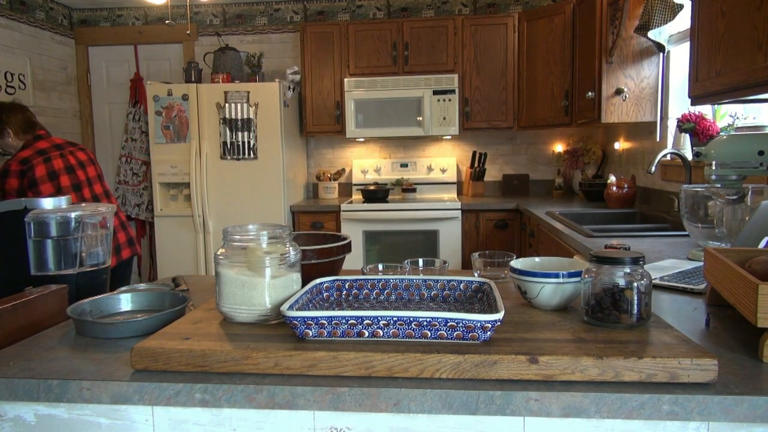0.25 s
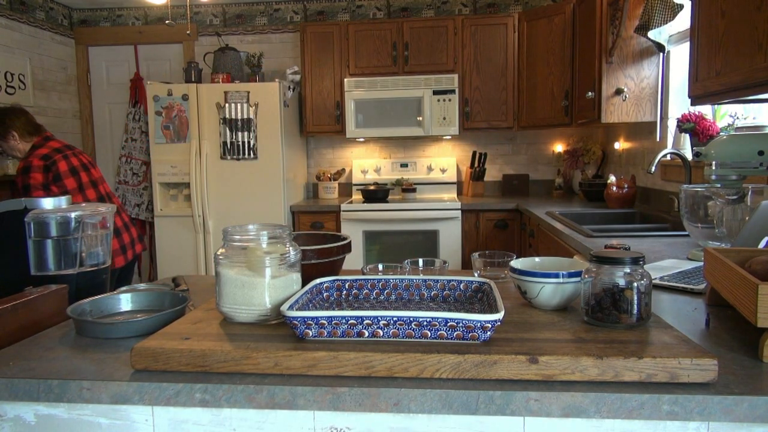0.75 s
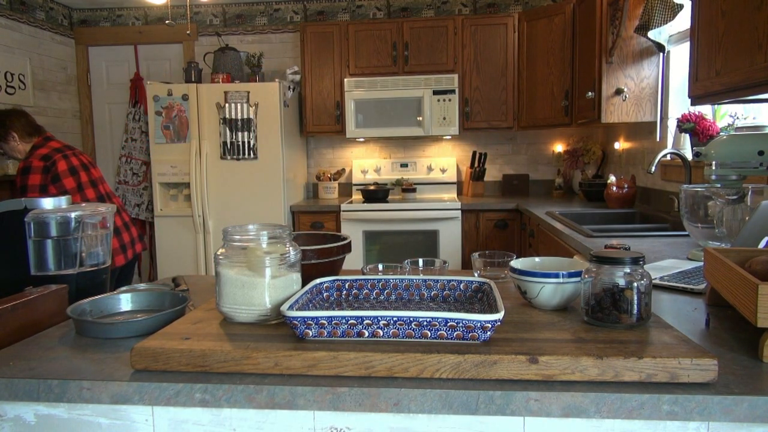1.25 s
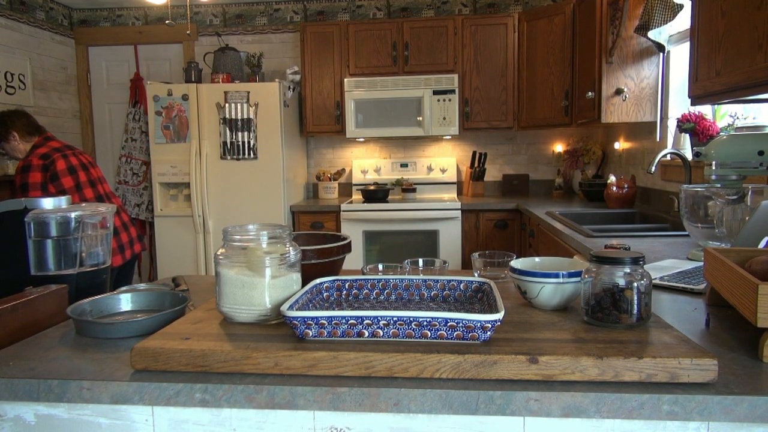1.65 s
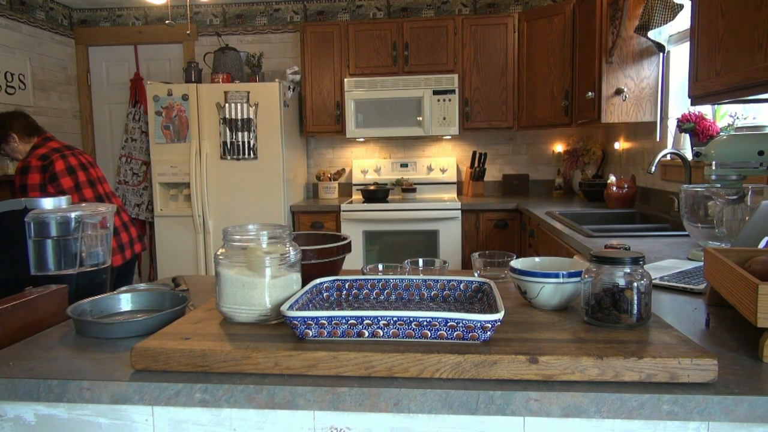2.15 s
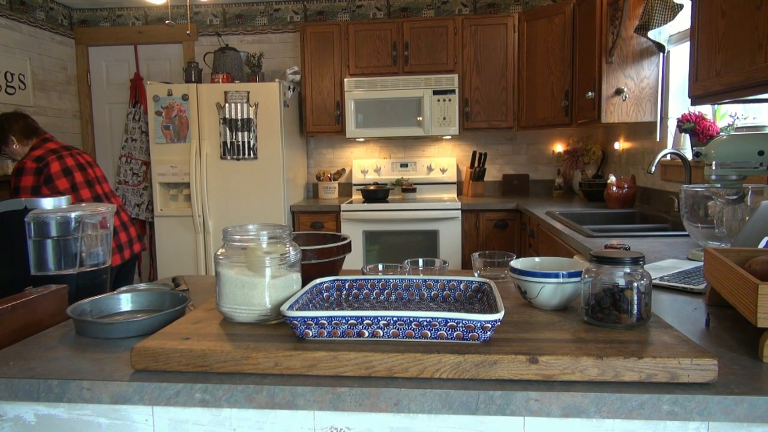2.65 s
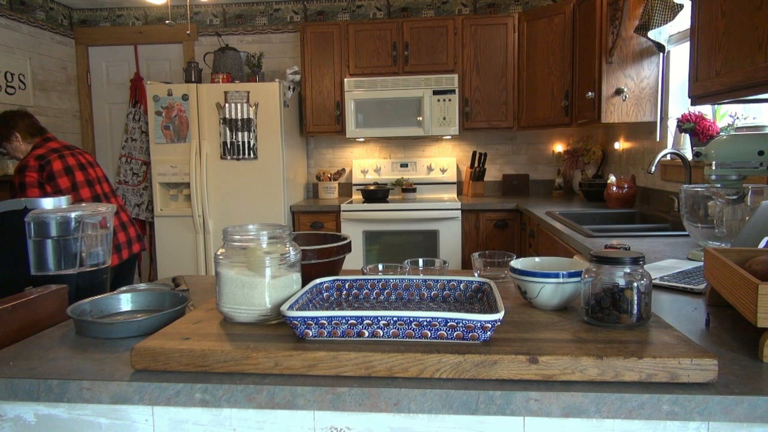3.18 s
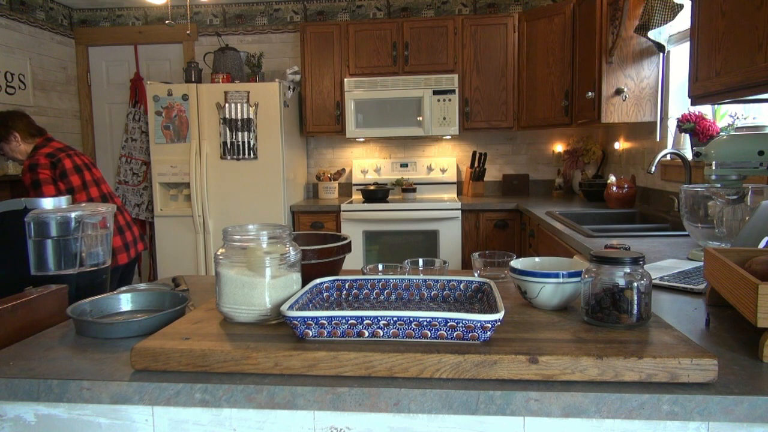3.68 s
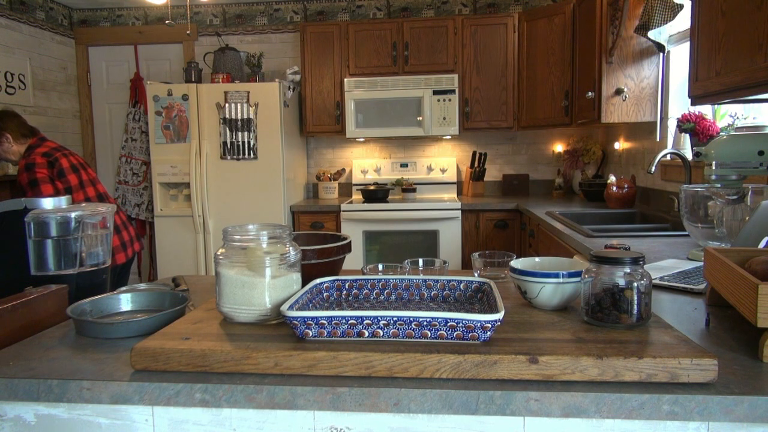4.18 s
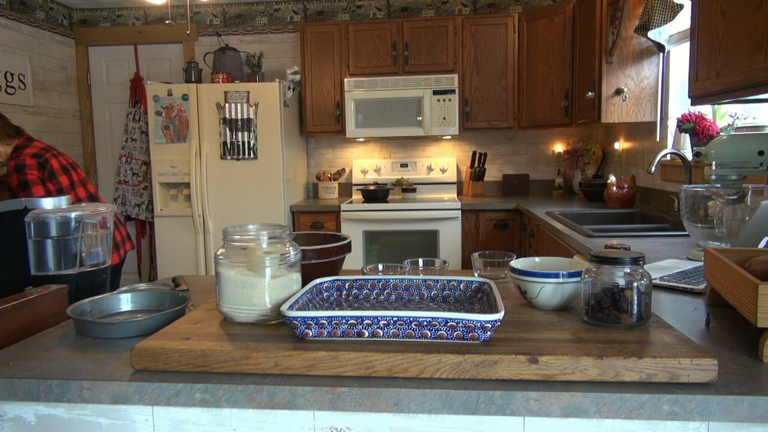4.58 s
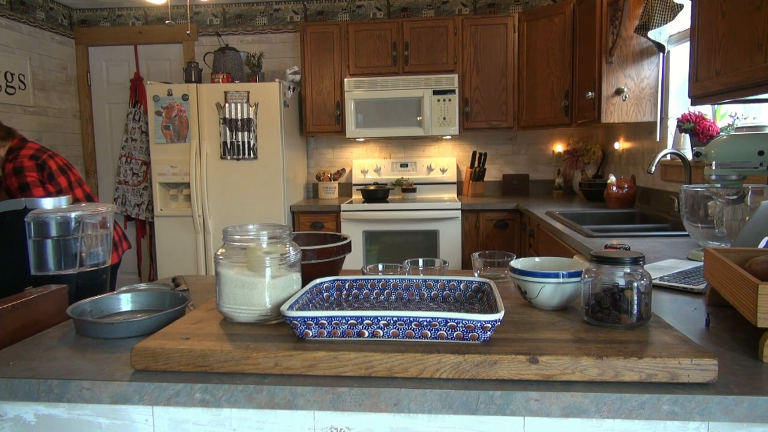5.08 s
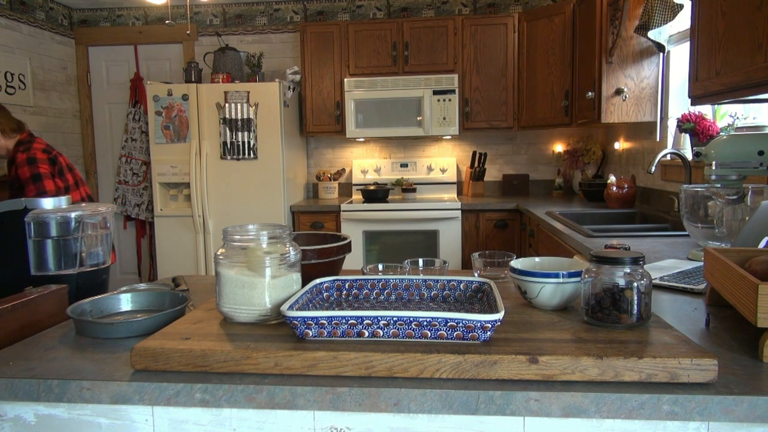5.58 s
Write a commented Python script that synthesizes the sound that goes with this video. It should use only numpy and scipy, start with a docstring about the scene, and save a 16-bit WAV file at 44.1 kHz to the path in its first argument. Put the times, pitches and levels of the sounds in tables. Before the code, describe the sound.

Distant, roomy drawer rummaging: the runners rumble and the drawer bumps its stop, then hollow plastic and hard metal pieces knock and slide together. A ringing steel cup stands out midway, followed by sparse light clicks and a busier, sharper clatter with short scrapes. After a brief pause the load rattles as the drawer starts shutting. Nearly mono, with faint hum and hiss in a lively kitchen.

```python
"""A hand rummages through plastic and steel utensils in a kitchen drawer, several metres from the microphone.
Knocks are noise bursts and chatter through resonances; sliding and scraping are dense random contacts.
Steel cups, scoops, a spoon, a blade and a fork ring as beating modes; the wooden drawer rolls open on slipping
runners, booms, thuds at its stop and later starts to roll shut with its load rattling.
Nearly everything arrives through the hard-walled room, over a low murmur and a smooth hiss."""
import sys
import numpy as np
from scipy import signal
from scipy.fft import rfft, irfft
from scipy.io import wavfile

SR = 44100
rng = np.random.default_rng(int(sys.argv[2]) if len(sys.argv) > 2 else 0)


def wav_out(sig):
    """Save sig, one row per channel (or a flat mono array), as 16-bit PCM at SR to the path in sys.argv[1]."""
    wavfile.write(sys.argv[1], SR, np.round(np.clip(np.atleast_2d(sig).T, -1, 1) * 32767).astype(np.int16))


N = 257103
T = np.arange(N) / SR  # s

# Colour of the quiet kitchen. Each row: frequency in Hz, relative level in dB.
QUIET_COLOUR = [(18, -62), (30, -44), (64, -18), (103, -5), (123, -13.5), (140, -24), (202, -2),
                (292, -3.5), (369, -1), (547, -13.5), (592, -4), (692, -5.5), (972, -8), (1920, -22),
                (15600, -30.5)]
# Reverberation of the kitchen. Each row: frequency in Hz, t60 in s.
KITCHEN_T60 = [(150, 0.41), (400, 0.45), (900, 0.4), (2500, 0.41), (6000, 0.36), (13000, 0.27)]

# Pulls and pushes that roll the drawer. Each row: start in s, level in dB, rise in s, run-out in s.
ROLLS = [(-0.1, -25, 0.33, 0.65), (5.33, -42.5, 0.018, 0.53), (5.429, -21, 0.071, 0.31),
         (5.72, -26, 0.048, 0.38)]
# Colour of the slipping runners. Each row: frequency in Hz, relative level in dB.
RUNNER_COLOUR = [(240, -45), (400, -18), (507, -0.5), (842, -7), (920, 1), (1050, -7), (2570, -17),
                 (3510, -24.5), (6180, -29), (8700, -43), (14000, -62)]
# Colour of the rolling wooden box. Each row: frequency in Hz, relative level in dB.
RUMBLE_COLOUR = [(110, -13), (150, -13.5), (185, 4), (240, -11.5), (330, -6), (450, -12.5), (650, -44)]
# The wooden drawer jolting on its runners and against its stop. Each row: start in s, level in dB.
JOLTS = [(0.186, -30.5), (0.322, -32), (0.469, -37.5), (0.738, -24.5), (.797, -22.5), (5.438, -25),
         (5.506, -28), (5.68, -33), (5.736, -30), (5.79, -32)]
# Modes of the wooden drawer. Each row: frequency in Hz, level in dB, t60 in s.
BOX_MODES = [(174, -9, 0.15), (197, 8, 0.1), (260, 2.5, 0.098), (350, -2, 0.079), (384, 0, 0.095),
             (453, -6, 0.08)]
# Thud of the cabinet. Each row: frequency in Hz, relative level in dB.
THUD_COLOUR = [(25, -17), (70, -47), (135, -42), (215, -3), (350, 1), (520, 6.5), (850, -11), (1500, -19.5),
               (2800, -19), (5000, -27.5), (9000, -44), (15000, -50)]

# Sweeps of the hand through the load. Each row: start in s, level in dB, rise in s, run-out in s.
STIRS = [(0.961, -25.5, 0.047, 0.4), (1.2, -21, 0.094, 0.11), (2.33, -36.5, 0.15, 0.57),
         (2.558, -15.5, 0.015, 0.5), (3.826, -10.5, 0.012, 0.45), (4.17, -25.5, 0.037, 0.14),
         (4.269, -20.5, 0.023, 0.2), (4.38, -18.5, 0.12, 0.3), (4.671, -10, 0.039, 0.21),
         (4.88, -33.5, 0.057, 0.39)]
# Colour of the sliding handles. Each row: frequency in Hz, relative level in dB.
STIR_COLOUR = [(88, -69), (150, -9.5), (314, -8.5), (428, -37), (519, 4.5), (894, 9), (1450, -6),
               (1910, -9), (2270, -5.5), (4220, -17.5), (8830, -33), (11400, -29), (15500, -114)]
# Hard edges dragged over each other. Each row: start in s, level in dB, rise in s, run-out in s.
SCRAPES = [(3.818, -20, 0.068, 0.18), (4.681, -17, 0.021, 0.02), (4.79, -26, 0.023, 0.042),
           (5.48, -30.5, 0.078, 0.099)]
# Colour of the dragged edges. Each row: frequency in Hz, relative level in dB.
SCRAPE_COLOUR = [(1760, -80), (3000, 4), (3840, 7), (5170, -0.5), (6010, 6.5), (6710, -5.5), (8780, -7),
                 (11600, -4.5), (15600, -14)]

# Blows on the large steel cup. Each row: start in s, level in dB.
CUP_BLOWS = [(2.230, -60), (2.43, -60), (2.50, -61), (2.580, -25.5), (2.655, -28)]
# Modes of the large steel cup. Each row: frequency in Hz, level in dB, t60 in s.
CUP_MODES = [(1265, -10, .7), (1782, -7, .65), (2040, -19, 1.1), (2503, -8, 1.7), (2821, -8, .55),
             (4188, -1, .55), (5268, -17, .6), (5609, -15, .4), (6828, -14, .5), (8355, -23, .4),
             (9711, -25, .5), (10298, -24, .4), (12000, -24, .45)]
# Blows on the nested steel scoops. Each row: start in s, level in dB.
SCOOP_BLOWS = [(.606, -49), (4.42, -49), (4.706, -25), (4.78, -37), (4.847, -33)]
# Modes of the nested steel scoops. Each row: frequency in Hz, level in dB, t60 in s.
SCOOP_MODES = [(1540, -7, .55), (2024, -11, .5), (2503, -15, 1.3), (2530, -13, 1.25), (2837, -3, .6),
               (3840, -6, .45), (4081, 2, .35), (4183, -5, .62), (5283, -12, .6), (7456, -15, .35),
               (9679, -20, .3), (11670, -17, .3)]
# Blows on a small spoon. Each row: start in s, level in dB.
SPOON_BLOWS = [(3.371, -41)]
# Modes of the small spoon. Each row: frequency in Hz, level in dB, t60 in s.
SPOON_MODES = [(4900, -6.5, 0.31), (5150, -4, 0.12), (6740, -11, .38), (9700, -8, 0.24), (9900, -9, 0.22),
               (13700, -3, 0.2)]
# Blows on a flat steel blade. Each row: start in s, level in dB.
BLADE_BLOWS = [(1.312, -53), (1.332, -36.5)]
# Modes of the blade, damped by the load it lies in. Each row: frequency in Hz, level in dB, t60 in s.
BLADE_MODES = [(2159, -6, .3), (2848, -9, .28), (3569, -7, .3), (4016, -2, .32), (4177, 0, .35),
               (4301, -1, .32)]
# Blows on a fork. Each row: start in s, level in dB.
FORK_BLOWS = [(2.95, -44)]
# Modes of the fork. Each row: frequency in Hz, level in dB, t60 in s.
FORK_MODES = [(3639, 0, .85), (4436, -7, .7), (6115, -9, .65)]

# Utensils knocking. Each row: start in s, strength in dB, hollowness (body over clack) in dB,
# hardness of the contact (tick over clack) in dB, clack resonance in Hz.
KNOCKS = [(0.074, -25.5, -2, -8, 1430), (0.312, -35, 6, -20, 2010), (0.6067, -24, -10.5, -6.5, 2260),
          (0.7103, -30, -1, -12, 2000), (0.7386, -16, 3, -8, 1740), (0.7965, -20.5, 0, 1, 2140),
          (1.0159, -37, 3, 11, 1676), (1.1145, -21, -8.5, -2, 3080), (1.2414, -30, 5, 13.5, 2760),
          (1.3148, -29.5, -23, -3.5, 3580), (1.334, -33.5, -25.5, -1, 2100), (1.6677, -30, -7, 1.5, 2330),
          (1.7614, -37.5, -3.5, -19, 2330), (2.2277, -33, -6, -26, 1430), (2.5781, -11.5, -11, -12, 2940),
          (2.603, -9.5, -16.5, -5.5, 1770), (2.7074, -15.5, -3.5, 1, 1830), (2.7894, -20, -10, -23, 2540),
          (2.9337, -27, -4, -1, 2500), (2.9814, -27.5, 2, 4, 1880), (3.0803, -37, -12, 7, 2420),
          (3.3287, -37, 8.5, 4, 2720), (3.371, -34.5, -11, 12.5, 1550), (3.7506, -18, 1, 0, 2640),
          (3.7808, -29, -13, 10, 2300), (3.8312, -15, 7.5, 12, 2430), (3.8736, -14, -2.5, 16.5, 2100),
          (3.9294, -18, 8.5, 2, 2030), (3.9868, -14.5, 3.5, -6, 2430), (4.1098, -27, -17, -18.5, 2130),
          (4.1695, -27, 0, -8, 1850), (4.2848, -23, -6.5, -15, 2740), (4.3154, -27.5, -6, 1, 1680),
          (4.3894, -28.5, 1.5, 8, 3870), (4.4191, -25, -0.5, 9, 3970), (4.4864, -20, -8, -2, 1850),
          (4.584, -26, -23, -8, 2900), (4.686, -23.5, -1, 12, 3100), (4.7056, -17, 7.5, 17, 3950),
          (4.7297, -17, -5, -3, 3950), (4.776, -15, -8.5, -17, 3830), (4.8222, -14.5, -9, -2, 2000),
          (4.8464, -14.5, -5.5, 6, 1480), (5.0894, -36.5, -5.5, 10, 2480), (5.1286, -36.5, -1, -3, 2440),
          (5.4363, -30, 2, 2, 2530), (5.4965, -29, 8.5, 16, 1610), (5.5323, -15.5, -1.5, -7, 2070),
          (5.5514, -14, 5, -1, 2430), (5.7331, -23.5, 0, -11.5, 2500)]
# Colour of clattering utensils. Each row: frequency in Hz, relative level in dB.
CLATTER_COLOUR = [(65, -67), (110, -39), (237, -9), (489, -11), (640, 4), (929, -4.5), (1350, -10.5),
                  (2000, -8.5), (3430, -17), (4130, -11), (4580, -16.5), (6000, -17), (8890, -38),
                  (11400, -20), (15600, -40)]
# Modes of the plastic cutlery tray. Each row: frequency in Hz, level in dB, t60 in s.
TRAY_MODES = [(308, -8, 0.3), (328.4, -7.5, 0.094), (529.6, -7, 0.13), (646, -12, 0.25), (712, -1.5, 0.066),
              (754.6, 8.5, 0.029), (865, 4, 0.047), (916.6, 5.5, 0.1), (950, -28, 0.31), (1003, -24, 0.17),
              (1171.3, -2.5, 0.05)]
# Borders between the thump, body, clack and tick registers, in Hz.
REGISTERS_HZ = [450, 1400, 9000]

QUIET_DB = -47.5
LURCH_DB, LURCH_PER_S = 1.3, 40  # the drawer runs unevenly
RUN_OUT_POWER = 1.6  # how steeply a movement loses its speed
STOP_S, STOP_DB = 0.7386, 19  # the drawer hits its end stop
BODY_HZ, BODY_SCATTER_OCTAVES = 850, 0.083  # hollow resonance of a middle-sized utensil
LOWEST_HZ = 201  # the utensils radiate little below this
TOP_HZ = 15600  # upper limit of the microphone signal


def undb(db):
    """Decibels to gain."""
    return 10 ** (np.asarray(db) / 20)


def unit(x):
    """Scale to unit energy."""
    return x / np.sqrt(np.sum(x ** 2) + 1e-18)


def fade(t, t60):
    """Exponential decay, 60 dB down at t60."""
    return np.exp(-np.log(1000) * t / t60)


def add(out, s, x):
    """Mix x into out from time s on."""
    i = max(int(s * SR), 0)
    out[i:i + len(x)] += x[:max(N - i, 0)]


def on_log(hz, points):
    """Read (Hz, value) points on a log-frequency axis."""
    f, value = np.transpose(points)
    return np.interp(np.log(np.maximum(hz, 1)), np.log(f), value)


def colour(x, points):
    """Causal filter with the given (Hz, dB) outline."""
    size = 4096
    outline_db = on_log(np.fft.rfftfreq(size, 1 / SR), points)
    # folding the cepstrum gives minimum phase: no sound ahead of the contact
    cepstrum = irfft(np.log(undb(outline_db)))
    cepstrum[1:size // 2] *= 2
    cepstrum[size // 2 + 1:] = 0
    response = irfft(np.exp(rfft(cepstrum)))[:size // 2]
    return signal.fftconvolve(x, response)[:len(x)]


def high_pass(x, hz, order=3):
    """Take the bass away."""
    return signal.sosfilt(signal.butter(order, hz, "high", fs=SR, output="sos"), x)


def resonate(x, hz, q):
    """One broad resonance; unit energy."""
    b, a = signal.iirpeak(np.clip(hz, 200, 9000), q, fs=SR)
    return unit(signal.lfilter(b, a, x))


def registers(order=4):
    """Filters for the thump, body, clack and tick registers."""
    a, b, c = REGISTERS_HZ
    bands = ((a, "low"), ((a, b), "band"), ((b, c), "band"), (c, "high"))
    return [signal.butter(order, f, kind, fs=SR, output="sos") for f, kind in bands]


def ring(modes, t):
    """Damped sines, each starting at a chance phase."""
    hz, db, t60 = np.transpose(modes)[:, :, None]
    waves = np.sin(2 * np.pi * (hz * t + rng.random(hz.shape)))
    return np.sum(undb(db) * fade(t, t60) * waves, axis=0)


def grains(per_s, spread_db):
    """Tiny contacts at random moments and of uneven size; rms 1."""
    sizes_db = spread_db * np.minimum(rng.exponential(size=N), np.pi)
    sizes = undb(sizes_db) * rng.choice([-1, 1], N)
    contacts = rng.random(N) < per_s / SR
    return unit(sizes * contacts) * np.sqrt(N)


def gesture(s, db, rise_s, run_out_s):
    """Gain of one movement: it gathers speed evenly, then runs out."""
    rise = np.clip((T - s) / rise_s, 0, 1)
    left = np.clip(1 - (T - s - rise_s) / run_out_s, 0, 1)
    return undb(db) * rise * left ** RUN_OUT_POWER


def quiet(side_db=-20):
    """Low murmur of the appliances and a smooth hiss, both as coloured noise."""
    mid, side = (unit(colour(rng.standard_normal(N), QUIET_COLOUR)) * np.sqrt(N) for _ in range(2))
    return undb(QUIET_DB) * (mid + undb(side_db) * side * np.array([[1], [-1]]))


def reverberation(early=0.89, early_t60=0.13, echoes_per_s=700, fill_s=0.0023):
    """Single echoes off cupboards and worktops and a diffuse tail that loses its treble first; both swell in."""
    t = T[:SR * 4 // 5]
    hz = np.fft.rfftfreq(len(t), 1 / SR)
    noise = rfft(rng.standard_normal(len(t)))
    centres, t60s = np.transpose(KITCHEN_T60)
    # overlapping bands share the noise, and each dies away at its own pace
    shares = [on_log(hz, np.column_stack([centres, row])) for row in np.eye(len(centres))]
    tail = sum(irfft(noise * share, len(t)) * fade(t, t60) for share, t60 in zip(shares, t60s))
    arrivals = rng.standard_normal(len(t)) * (rng.random(len(t)) < echoes_per_s / SR)
    echoes = arrivals * fade(t, early_t60)
    swell = 1 - np.exp(-t / fill_s)
    return unit((unit(tail) + early * unit(echoes)) * swell)


def runners(scrape_db=-4, rumble_db=-8):
    """The runners catch and slip; the wooden box rumbles with them. Both follow the drawer's lurching speed."""
    moments = np.arange(200) / LURCH_PER_S
    lurch = undb(LURCH_DB * np.interp(T, moments, rng.standard_normal(len(moments))))
    speed = lurch * sum(gesture(*roll) for roll in ROLLS)
    slips = grains(per_s=900, spread_db=4)
    scrape = undb(scrape_db) * unit(colour(slips, RUNNER_COLOUR))
    rumble = undb(rumble_db) * unit(colour(slips, RUMBLE_COLOUR))
    return (scrape + rumble) * np.sqrt(N) * speed


def jolts(box_db=30):
    """The wooden box booms briefly in its damped modes when it catches or stops."""
    out, t = np.zeros(N), T[:SR // 4]
    for s, db in JOLTS:
        boom = unit(high_pass(ring(BOX_MODES, t), hz=175))
        add(out, s, undb(db + box_db) * boom)
    return out


def end_stop(shudder=0.46, shudder_t60=0.06):
    """The drawer strikes its stop; an impulse and fading noise make the cabinet thud and shudder."""
    out, t = np.zeros(N), T[:SR // 4]
    push = (t == 0) + shudder * unit(rng.standard_normal(len(t)) * fade(t, shudder_t60))
    add(out, STOP_S, undb(STOP_DB) * unit(colour(push, THUD_COLOUR)))
    return out


def stirring(stir_db=-9):
    """Handles slide over each other in a dense patter of small contacts."""
    effort = sum(gesture(*stir) for stir in STIRS)
    patter = grains(per_s=600, spread_db=4)
    return unit(colour(patter, STIR_COLOUR)) * np.sqrt(N) * effort * undb(stir_db)


def scraping(scrape_db=-4):
    """Dragged edges catch and slip about two thousand times a second."""
    pressure = sum(gesture(*scrape) for scrape in SCRAPES)
    slips = grains(per_s=2000, spread_db=4.5)
    return unit(colour(slips, SCRAPE_COLOUR)) * np.sqrt(N) * pressure * undb(scrape_db)


def steel(blows, modes, split_hz=11, swell_s=0.00047):
    """Each blow tops up the ringing modes; the thing is not quite round, so each mode beats with a weak twin."""
    out, t = np.zeros(N), T[:SR * 3 // 2]
    for hz, mode_db, t60 in modes:
        swing = np.zeros(N)
        for s, db in blows:
            add(swing, s, undb(db + mode_db) * (1 - np.exp(-t / swell_s)) * fade(t, t60))
        live = swing > 0
        turns = hz * T[live] + rng.random()
        # the twin lies between half of split_hz and all of it above the mode
        beat = split_hz * rng.uniform(0.5, 1) * T[live] + rng.random()
        mode, twin = np.sin(2 * np.pi * turns), np.sin(2 * np.pi * (turns + beat))
        out[live] += swing[live] * (mode + twin / 5)
    return out


def utensil(crack, t, own_modes=0.78, own_t60=0.054, count=40):
    """Every utensil adds many short, weak modes of its own to the contact."""
    strength_db = rng.normal(0, 2.5, count)
    hz = np.geomspace(1000, 15000, count) * rng.uniform(0.83, 1.1, count)
    own = np.column_stack([hz, strength_db, np.full(count, own_t60)])
    return unit(colour(crack + own_modes * unit(ring(own, t)), CLATTER_COLOUR))


def knock(t, clack_hz, body_hz, contact_t60=0.014, chatter=0.73, chatter_t60=0.038,
          edge=0.55, hollow=0.21, tray=0.75):
    """A contact and the chatter after it excite the utensil; the tray under it rings along."""
    hits = rng.standard_normal(len(t)) * (rng.random(len(t)) < 1500 / SR)  # 1500 rebounds per s
    rebounds = hits * fade(t, chatter_t60)
    contact = rng.standard_normal(len(t)) * fade(t, contact_t60)
    crack = unit(contact) + chatter * unit(rebounds)
    resonances = edge * resonate(crack, clack_hz, q=9.8) + hollow * resonate(crack, body_hz, q=3.6)
    return utensil(crack, t) + resonances + tray * unit(ring(TRAY_MODES, t))


def knocks(thump_db=14, body_db=29, clack_db=19.0, tick_db=0, edge_ratio=4.3, brightening=0.69, order=2):
    """Every blow thumps in step with its strength; hollow plastic sounds its body, hard edges clack and tick."""
    out, t, filters = np.zeros(N), T[:SR // 5], registers()
    for s, strength, hollowness, hardness, clack_hz in KNOCKS:
        body_hz = BODY_HZ * 2 ** (BODY_SCATTER_OCTAVES * rng.standard_normal())
        blow = high_pass(knock(t, clack_hz, body_hz), LOWEST_HZ)  # small things radiate no bass
        parts = [signal.sosfilt(sos, blow) for sos in filters]
        # a soft contact has little tick, and its clack is dull above the resonance too
        top_hz = np.clip(edge_ratio * clack_hz * undb(brightening * hardness), 2000, 14000)
        parts[2] = signal.sosfilt(signal.butter(order, top_hz, fs=SR, output="sos"), parts[2])
        body, clack = strength + hollowness / 2, strength - hollowness / 2
        levels_db = (strength + thump_db, body + body_db, clack + clack_db, clack + hardness + tick_db)
        add(out, s, sum(undb(db) * unit(part) for part, db in zip(parts, levels_db)))
    return out


def scene(direct=0.34, width_db=-27):
    """All sources in the room; both sides of the microphone hear almost the same."""
    movement = high_pass(runners() + stirring() + scraping(), hz=139)
    clatter = knocks() + jolts() + end_stop() + movement
    things = [(CUP_BLOWS, CUP_MODES), (SCOOP_BLOWS, SCOOP_MODES), (SPOON_BLOWS, SPOON_MODES),
              (BLADE_BLOWS, BLADE_MODES), (FORK_BLOWS, FORK_MODES)]
    rings = sum(steel(blows, modes) for blows, modes in things)
    into_room = clatter + rings / 5
    mid, side = (signal.fftconvolve(into_room, reverberation())[:N] for _ in range(2))
    room = mid + undb(width_db) * side * np.array([[1], [-1]])
    return direct * clatter + rings + room + quiet()


def record(dry, right_db=2.0):
    """The right channel is louder by right_db; peaks stop at full scale, then the top is cut."""
    balance = undb(np.array([[-right_db], [right_db]]) / 2)
    x = np.clip(dry * balance, -1, 1)
    return signal.sosfilt(signal.ellip(12, .2, 80, TOP_HZ, fs=SR, output="sos"), x)


dry = scene()
out = record(dry)
wav_out(out)
```